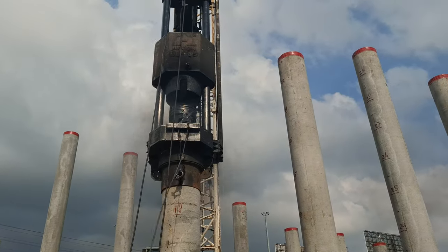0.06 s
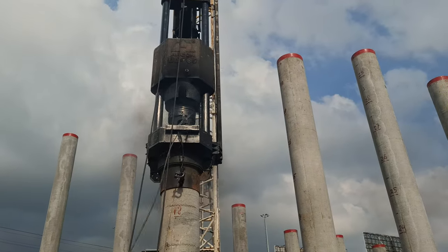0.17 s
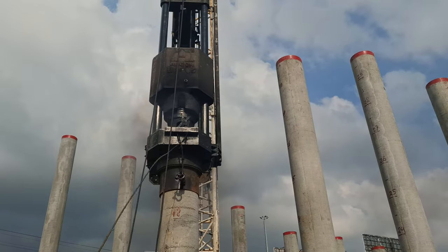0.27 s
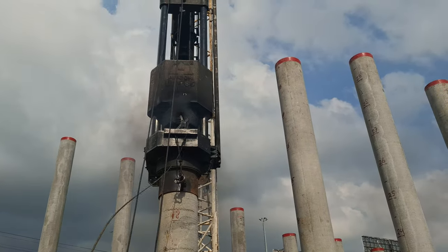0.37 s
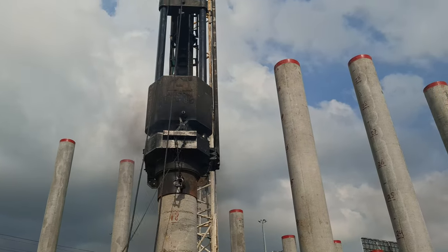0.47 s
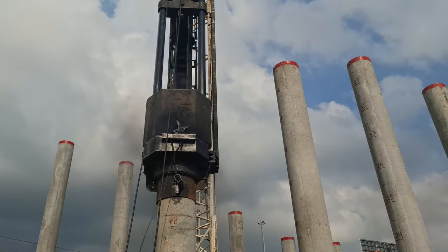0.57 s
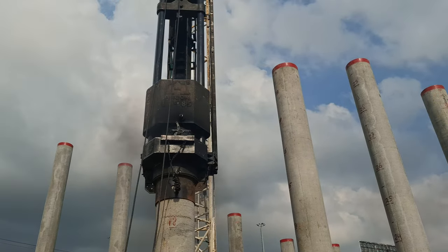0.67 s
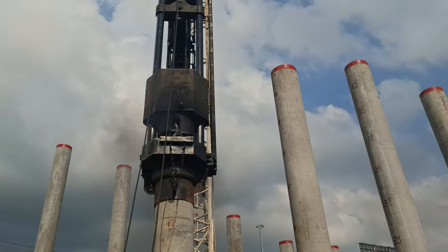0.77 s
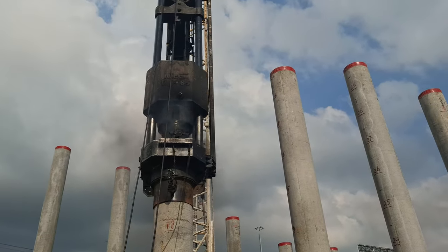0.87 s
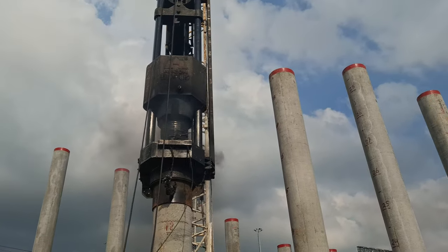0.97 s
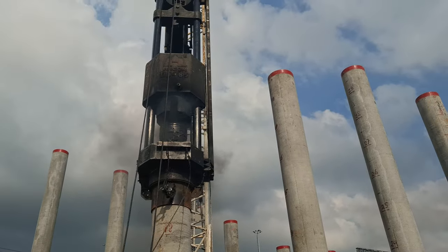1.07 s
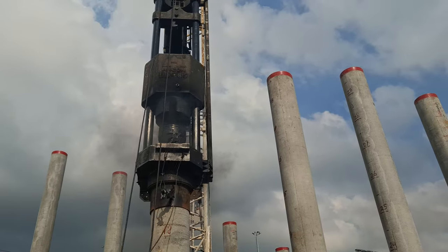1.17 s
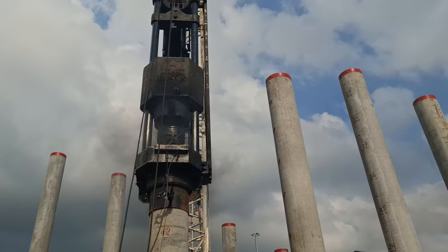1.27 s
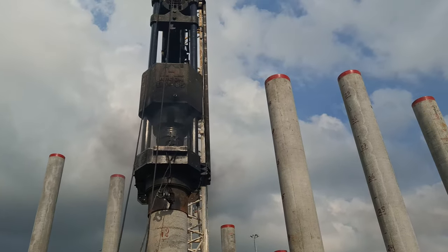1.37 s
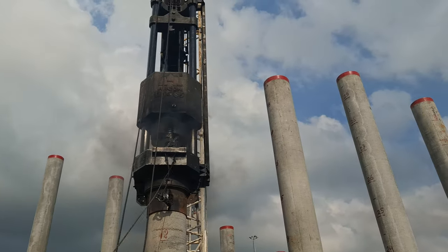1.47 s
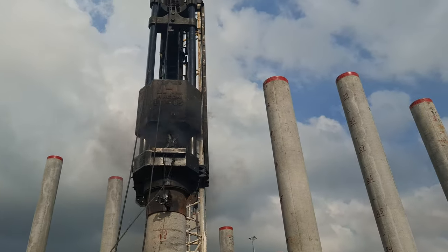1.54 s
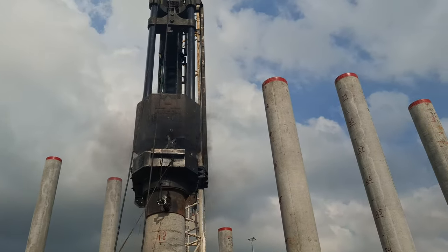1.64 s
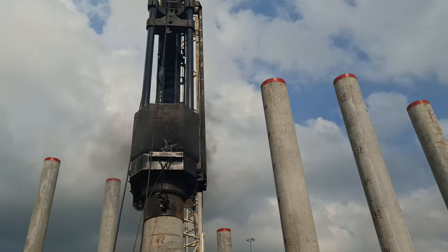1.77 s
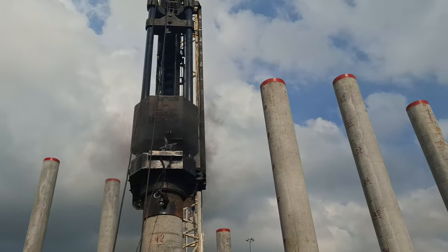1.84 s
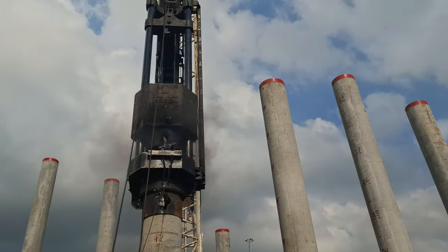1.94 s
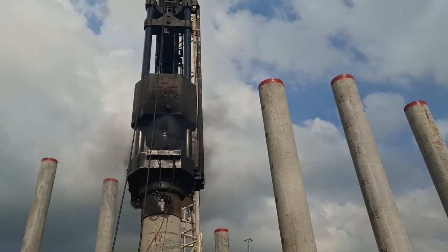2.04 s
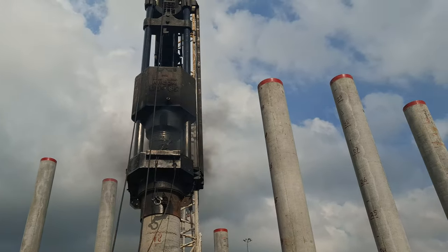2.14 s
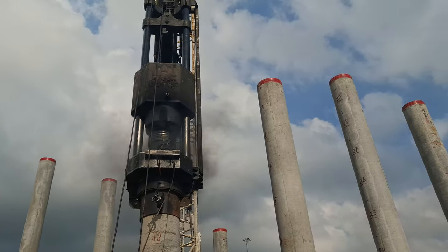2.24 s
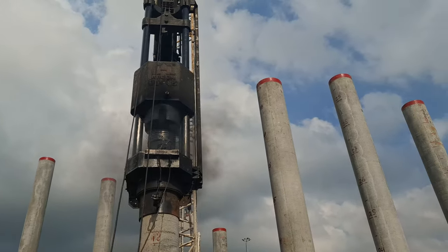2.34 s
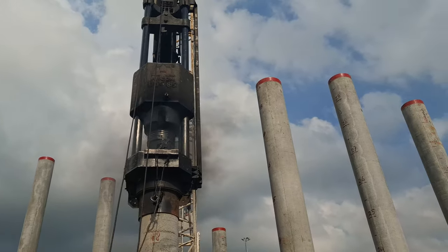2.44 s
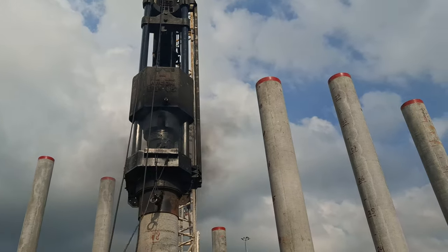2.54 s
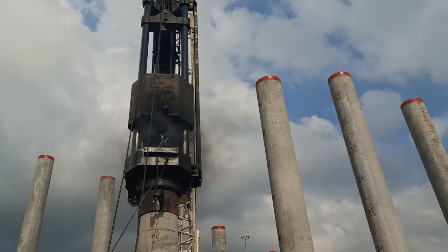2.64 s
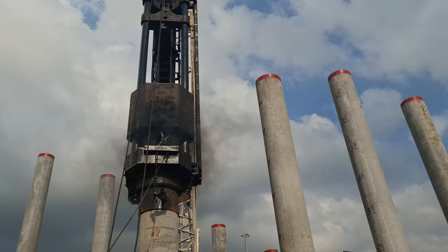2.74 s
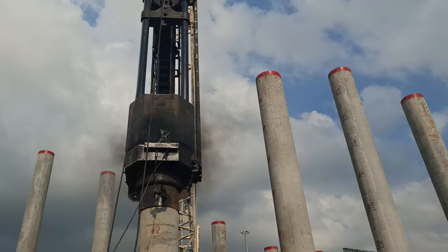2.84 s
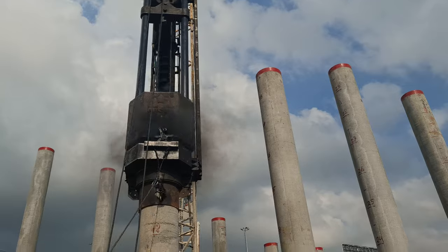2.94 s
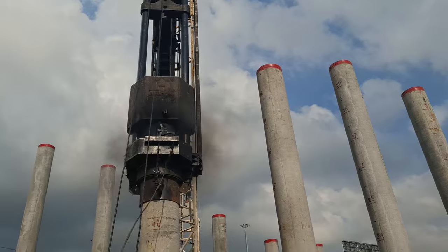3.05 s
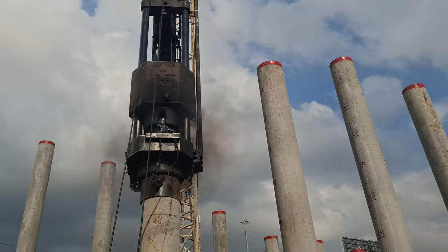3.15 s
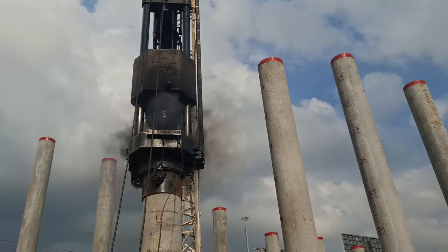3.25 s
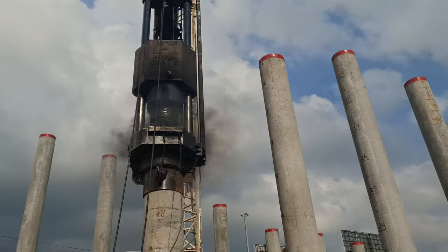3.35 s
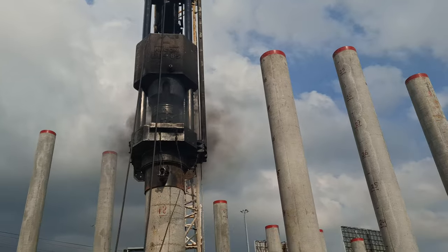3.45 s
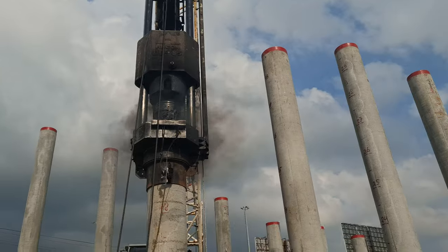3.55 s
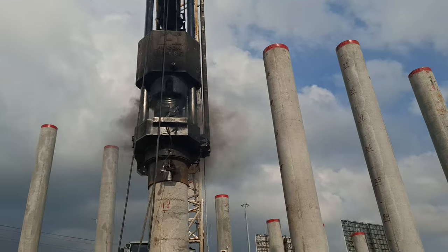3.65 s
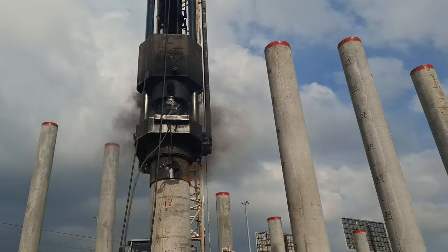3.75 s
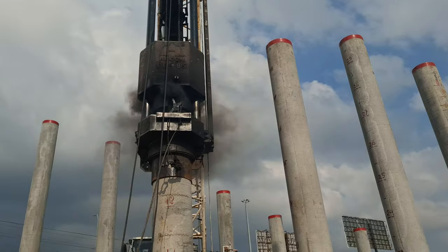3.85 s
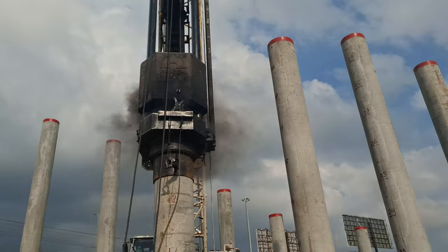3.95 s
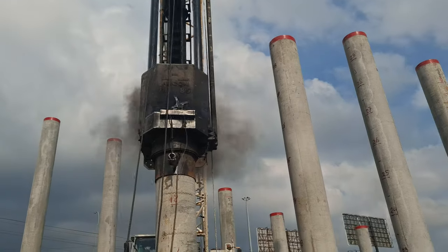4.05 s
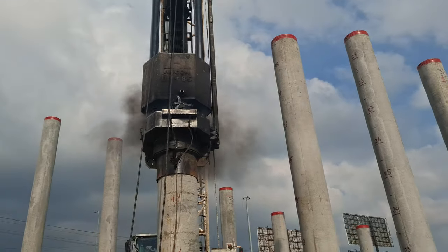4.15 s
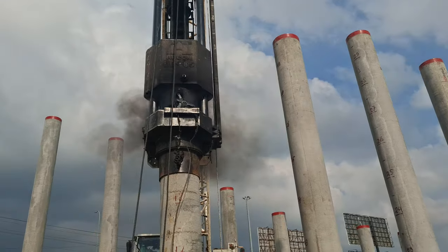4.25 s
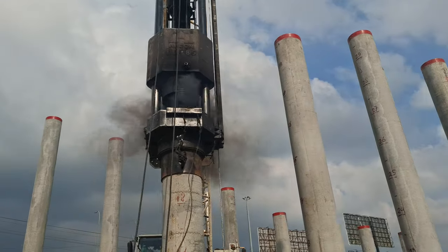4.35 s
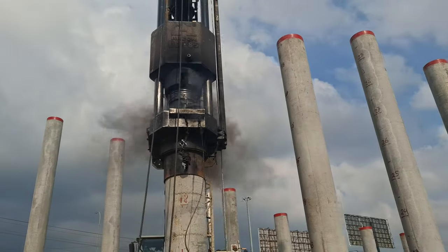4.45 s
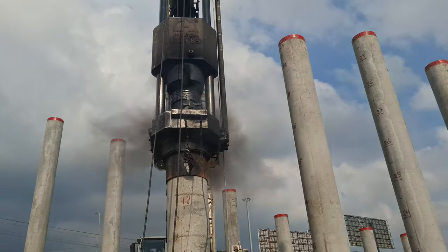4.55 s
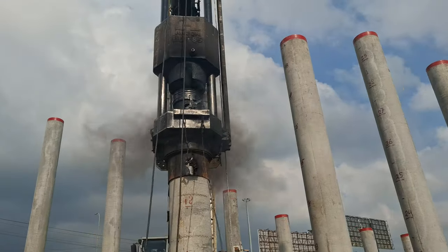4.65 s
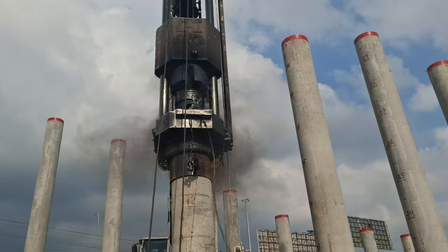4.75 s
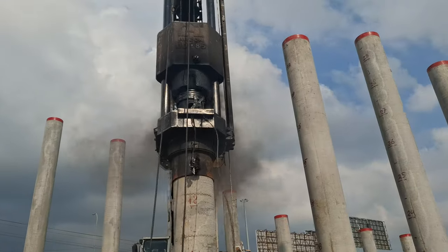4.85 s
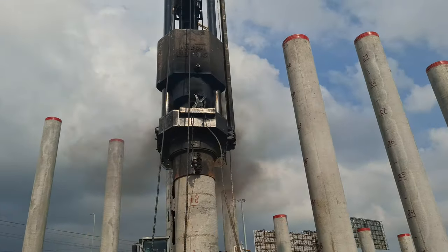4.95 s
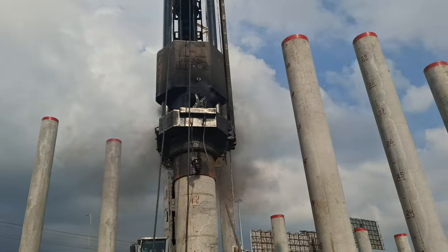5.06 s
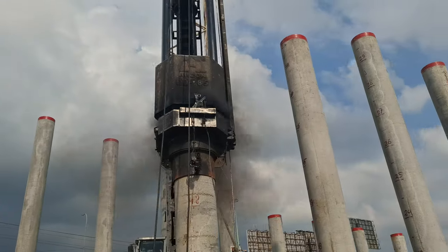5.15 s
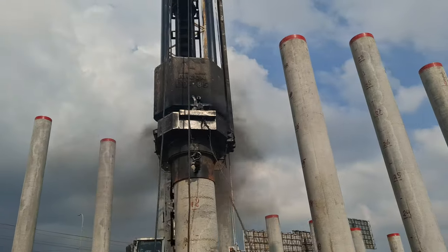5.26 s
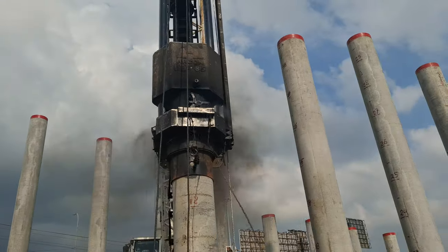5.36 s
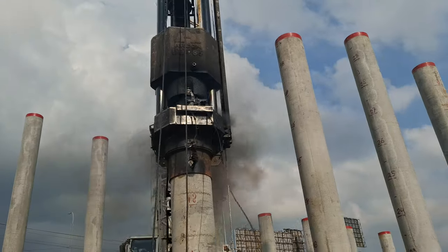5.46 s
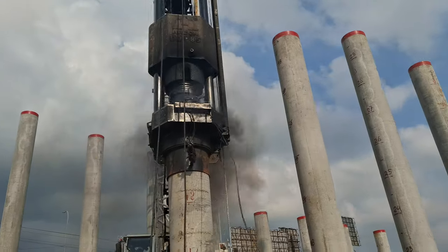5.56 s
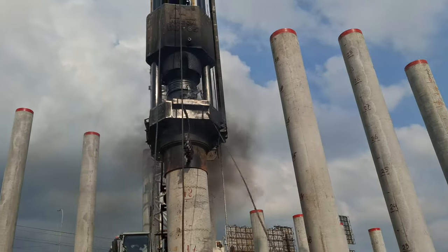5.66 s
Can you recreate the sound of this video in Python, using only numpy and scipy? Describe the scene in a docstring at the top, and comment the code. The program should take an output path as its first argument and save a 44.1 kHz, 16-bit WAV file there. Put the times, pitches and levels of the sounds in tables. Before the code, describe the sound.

Heavy steel clanks, scrapes and slams about once a second as a pile driver fires, with exhaust hiss and faint engine rumble outdoors.

```python
"""A diesel pile hammer drives a concrete pile on an open building site, a blow every 1.16 s.
Each cycle the rig clanks and clacks, the ram scrapes down its guide rods, trips the fuel pump
and strikes; the charge booms, exhaust hisses out and loose steel rings. Contacts are noise
bursts through resonant bodies. Engines rumble behind, and the site echoes."""
import sys
import numpy as np
from scipy import signal
from scipy.fft import rfft, irfft, next_fast_len
from scipy.io import wavfile
from scipy.ndimage import uniform_filter1d, map_coordinates

SR = 44100
rng = np.random.default_rng(int(sys.argv[2]) if len(sys.argv) > 2 else 0)


def wav_record(signal):
    """Record a signal, one row per channel, as 16-bit PCM in the file named by sys.argv[1]."""
    frames = np.transpose(np.atleast_2d(signal))
    bounded = np.clip(frames, -1, 1)
    # unit amplitude maps onto the largest positive 16-bit level
    quanta = np.round(bounded * 32767).astype(np.int16)
    wavfile.write(sys.argv[1], SR, quanta)


N = 252252

# ram lands and fires: (time [s], relative levels [dB] of blow, boom, exhaust, growl, bass, tick, knock)
BLOWS = [(.903, -12.5, -18.5, -23, -29.5, -2.5, -29, -27), (2.086, -11, -14, -21, -24.5, 0, -33.5, -24),
         (3.250, -13, -13, -19, -27.5, 3, -27, -22.5), (4.403, -12, -13, -21.5, -33.5, 5, -28.5, -23.5),
         (5.546, -13.5, -19.5, -23.5, -25.5, 0.5, -24, -22)]
# catch clacks, slide starts: (time [s], relative level [dB], nominal length [s], tilt [dB/octave])
CLACKS = [(0.6, -16, 0.0082, -1), (1.776, -15, 0.012, 0), (2.936, -13.5, 0.021, -1),
          (4.091, -14, 0.017, -3.5), (5.246, -14, 0.0064, 1.5)]
# bare steel contact: (frequency [Hz], level [dB])
STEEL_SPECTRUM = [(100, -45), (300, -14.5), (550, -6.5), (1500, -6.5), (2400, -5), (4500, 3), (7000, -8.5),
                  (12000, -5.5), (16000, -21)]
# mast shudder and air growl: (frequency [Hz], level [dB])
SHUDDER_SPECTRUM = [(40, -52), (100, -0.5), (180, -1.5), (280, -3.5), (560, -3), (900, -8), (2000, -44.5)]
# cylinder resonances: (frequency [Hz], width [Hz], lift [dB])
CYLINDER_MODES = [(2100, 180, 3.5), (2702, 72, 16), (2927, 60, 5.1), (4500, 160, 2.1), (8500, 80, 8.4),
                  (11860, 120, 5)]


def amp(db):
    return 10 ** (np.asarray(db) / 20)


def unit(x):
    return x / np.sqrt(np.mean(x ** 2) + 1e-20)


def along(points, hz):
    """Interpolate (frequency [Hz], value) points on a log axis."""
    f, v = np.transpose(points)
    return np.interp(np.log(hz + 1), np.log(f + 1), v)


def wobble(rate_hz, size):
    """Smooth random curve."""
    knots = rng.standard_normal(8192)
    return map_coordinates(knots, [np.arange(size) * rate_hz / SR], order=2, mode="wrap")


def filtered(x, response):
    """Apply a complex frequency response."""
    m = next_fast_len(N + SR // 2)
    return irfft(rfft(x, m) * response(np.fft.rfftfreq(m, 1 / SR)), m)[..., :N]


def body(spectrum, modes=(), tilt=0, bass_db=0, size=4096):
    """Minimum-phase impulse response of energy 1: a broad spectrum lifted by resonances."""
    hz = np.fft.rfftfreq(size, 1 / SR)
    lift = 1 + sum((amp(db) - 1) / (1 + (2 * (hz - f) / width) ** 2) for f, width, db in modes)
    broad_db = along(spectrum, hz) + tilt * np.log2(1 + hz / 1000) + bass_db / (1 + (hz / 300) ** 4)
    cepstrum = irfft(np.log(np.abs(lift) * amp(broad_db) + 1e-6))[:size // 2]
    response = irfft(np.exp(rfft(2 * cepstrum, size)))
    return response / np.linalg.norm(response)


def through(x, response):
    return signal.fftconvolve(x, response[None], axes=1)[:, :x.shape[1]]


def add(track, at_s, x):
    start = max(round(at_s * SR), 0)
    track[:, start:start + x.shape[1]] += x[:, :max(N - start, 0)]


def grit(size, rough_db):
    """Two noises whose strength jumps together from one tiny contact to the next."""
    return unit(rng.standard_normal((2, size)) * amp(rough_db * wobble(600, size)))


def shimmer(x, depth_db):
    """Short-lived resonances flare and fade: a random gain field over pitch and time."""
    z = signal.stft(x, nperseg=1024, noverlap=768)[2]
    field = rng.standard_normal(z.shape[1:])
    for _ in range(2):
        field = uniform_filter1d(uniform_filter1d(field, 3, 0), 7, 1)
    y = signal.istft(z * unit(amp(depth_db * unit(field))), nperseg=1024, noverlap=768)[1]
    return y[:, :x.shape[1]]


def ring(modes):
    """Steel modes die away, slightly unsteady, at new strengths for every strike."""
    t, tones = np.arange(SR // 2) / SR, 0
    for hz, db, t60_s in modes:
        decay = amp(db + rng.normal(0, 1.2) - 60 * t / t60_s)
        cycles = hz * t + rng.random((2, 1)) + .13 * wobble(70, len(t))
        tones += decay * np.sin(2 * np.pi * cycles)
    return tones * (1 - np.exp(-t / .0058))


def burst(rise_s, hold_s, t60_s, damping, rough_db, lead_db=-60, lead_s=.02):
    """Chattering contact: creeps in, swells, holds, dies. Times hold at 2 kHz; treble is quicker."""
    hz, t, z = signal.stft(shimmer(grit(SR // 2, rough_db), depth_db=3), SR, nperseg=64)
    t = t - lead_s
    life = (np.maximum(hz, 400)[:, None] / 2000) ** -damping
    main = np.clip(t / (rise_s * life), 0, 1) * amp(-60 * np.maximum(t / life - hold_s, 0) / t60_s)
    creep = amp(lead_db) * np.clip(1 + t / lead_s, 0, 1) ** 2 * (t < rise_s)
    return signal.istft(z * (main + creep), SR, nperseg=64)[1], lead_s


def add_hit(track, at_s, db, response, contact):
    """Play a contact through a body, main onset at at_s."""
    force, lead_s = contact
    add(track, at_s - lead_s, amp(db) * through(force, response))


def engines():
    """Machines idle across the site, waver and slowly pick up."""
    spectrum = [(15, -59), (25, -14), (44, -13), (64, -5), (78, -11), (92, -9), (223, -20.5), (256, -24.5),
                (714, -26.5), (1560, -39), (2160, -34), (6380, -49.5), (7510, -50), (16000, -61)]  # rumble: (frequency [Hz], level [dB])
    idle_db, rev_db, waver_db = -45, 5.5, 2.5
    rev_start_s, rev_s = 1.09, 2.7
    revving = np.clip((np.arange(N) / SR - rev_start_s) / rev_s, 0, 1)
    level = amp(idle_db + rev_db * revving + waver_db * wobble(11, N))
    return level * through(grit(N, rough_db=1.5), body(spectrum))


def yard(x):
    """Piles and machines scatter a thin, long tail."""
    decay = [(100, 2.9), (700, 1.07), (3000, 0.85), (8000, 0.89), (16000, 0.57)]  # reverberation: (frequency [Hz], t60 [s])
    hz, t, z = signal.stft(rng.standard_normal((2, SR)), SR, nperseg=256)
    envelope = amp(-60 * t / along(decay, hz)[:, None]) * (1 - np.exp(-t / .0058))
    tail = signal.istft(z * envelope, SR, nperseg=256)[1]
    return signal.fftconvolve(x, tail / np.linalg.norm(tail[0]), axes=1)[:, :N]


def rigging():
    """Struts and cables ring in short, rough notes."""
    pings = [(.356, 2170, -44), (1.715, 7750, -54), (3.76, 4500, -48), (5.112, 435, -33)]  # notes: (time [s], pitch [Hz], relative level [dB])
    out = np.zeros((2, N))
    width_ratio, t60_s = .06, .19
    for at_s, hz, db in pings:
        unsteady = unit(1 + wobble(width_ratio * hz, SR // 2))
        add(out, at_s, unsteady * ring([(hz, db + 7.5, t60_s)]))
    return out


def fitting():
    """Loose steel rattles, rings on and falls back once."""
    clinks = [(0.027, -28), (1.195, -29), (3.615, -24), (4.778, -25)]  # strikes: (time [s], level [dB])
    spectrum = [(100, -7.5), (500, 1), (1200, 1.5), (1800, -2.5), (2900, -2.5), (4700, -1.5), (6000, -9),
                (10000, -15.5), (16000, -23.5)]  # rattle: (frequency [Hz], level [dB])
    modes = [(354, -18, .42), (712, -9, .5), (1200, 0, .23), (1498, -9, .17), (2230, -22, .4),
             (2470, -14.5, .1), (2880, -10.5, .13), (4270, -9, .13), (4680, -6, .084), (6700, -23, .2)]  # ring: (frequency [Hz], level [dB], t60 [s])
    out = np.zeros((2, N))
    rebound_s, rebound_db, ring_db = .143, -22, 2.5
    for at_s, db in clinks:
        for delay_s, loss_db in [(0, 0), (rebound_s, rebound_db)]:
            rattle = burst(rise_s=.0012, hold_s=.012, t60_s=.18, damping=.47, rough_db=3.5)
            add_hit(out, at_s + delay_s, db + loss_db, body(spectrum), rattle)
            add(out, at_s + delay_s, amp(db + loss_db + ring_db) * ring(modes))
    return out


def frame():
    """Heavy contacts clank, bare steel cracks, and the hollow frame clangs under load."""
    # contacts: (time [s], level [dB], rise [s], hold [s], tilt [dB/octave], bass [dB], crack [dB])
    clanks = [(.444, -17, 0.00049, 0.0089, -3.5, 1.5, -27), (0.453, -22.5, 0.0013, 0.02, -0.5, -1, -40),
              (1.607, -20, 0.0024, 0.006, -2, -13, -46), (1.6258, -15.5, 0.0024, 0.0031, -3.5, -8.5, -17.5),
              (2.7662, -13, .001, 0.0023, 0, 2, -13), (2.779, -17, .0021, .0071, 0, -2, -16),
              (3.918, -17.5, 0.0015, .0019, -1, -2, -16.5), (3.932, -16.5, 0.0018, .015, 0, -3.5, -37),
              (5.069, -16.5, .013, 0.013, -5.5, -0.5, -37), (5.087, -14, 0.00088, 0.0013, -1.5, 0.5, -40),
              (5.102, -19.5, 0.001, 0.0038, -2.5, -3.5, -28)]
    clank_spectrum = [(50, -22), (160, 0.5), (260, -9.5), (450, 2), (1300, -6), (2400, -6.5), (4000, -13.5),
                      (7000, -14), (11000, -18.5), (16000, -29)]  # heavy contact: (frequency [Hz], level [dB])
    frame_modes = [(171, 51, 2.8), (565, 31, 2.7), (793, 48, 7.1), (1310, 94, 12.2), (1970, 110, 3.6),
                   (2890, 230, 8), (3504, 140, 10.7), (3655, 110, 4), (4550, 150, 4.9), (6340, 98, 3.8),
                   (9300, 380, 3.6), (10400, 280, 1.7)]  # frame resonances: (frequency [Hz], width [Hz], lift [dB])
    steel_modes = [(3800, 300, 4.7), (6070, 290, 13), (7970, 260, 14)]  # crack resonances: (frequency [Hz], width [Hz], lift [dB])
    clangs = [(1.628, -20), (2.782, -14), (3.941, -20.5), (5.087, -23.5)]  # frame takes the load: (time [s], level [dB])
    clang_spectrum = [(200, -32), (600, -21.5), (950, 3), (1350, 9), (1900, 8.5), (2500, -23.5),
                      (5000, -29), (16000, -52)]  # hollow frame: (frequency [Hz], level [dB])
    out = np.zeros((2, N))
    for at_s, db, rise_s, hold_s, tilt, bass_db, crack_db in clanks:
        clank = burst(rise_s, hold_s, t60_s=.13, damping=.061, rough_db=3.5, lead_db=-13, lead_s=.026)
        add_hit(out, at_s, db, body(clank_spectrum, frame_modes, tilt, bass_db), clank)
        crack = burst(rise_s=.0003, hold_s=.002, t60_s=.018, damping=.1, rough_db=2)
        add_hit(out, at_s, crack_db, body(STEEL_SPECTRUM, steel_modes, tilt=2), crack)
    for at_s, db in clangs:
        clang = burst(rise_s=.0005, hold_s=.013, t60_s=.063, damping=.099, rough_db=.5)
        add_hit(out, at_s, db, body(clang_spectrum), clang)
    return out


def catch():
    """The catch touches, slams home and rings on."""
    clack_modes = [(880, 40, 1.4), (1130, 110, 2), (2880, 83, 7.9), (3270, 72, 12), (5850, 570, 4.4),
                   (8740, 320, 6.1), (12600, 93, 5.7), (12300, 160, 6.7)]  # catch resonances: (frequency [Hz], width [Hz], lift [dB])
    ring_modes = [(616, -2.5, 0.57), (1224, 2.5, 0.25), (3100, -6, 0.064), (3220, -9, .08)]  # after-ring: (frequency [Hz], level [dB], t60 [s])
    out = np.zeros((2, N))
    for at_s, db, length_s, tilt in CLACKS:
        steel = body(STEEL_SPECTRUM, clack_modes, tilt)
        touch = burst(rise_s=.0009, hold_s=.0035, t60_s=.035, damping=.14, rough_db=2)
        add_hit(out, at_s, db - 4.5, steel, touch)
        slam = burst(rise_s=.001, hold_s=.18 * length_s, t60_s=.12, damping=.79, rough_db=.5)
        add_hit(out, at_s + .0085, db - .5, steel, slam)
        add(out, at_s + .00503, amp(db - 14) * ring(ring_modes))
    return out


def fuel_pump():
    """The ram trips the pump just before each blow."""
    spectrum = [(1000, -27.5), (4000, -6), (8300, 1), (11000, -14), (16000, -10)]  # tick: (frequency [Hz], level [dB])
    out = np.zeros((2, N))
    for at_s, *_, db, _ in BLOWS:
        tick = burst(rise_s=.00082, hold_s=.0044, t60_s=.018, damping=.089, rough_db=1.5)
        add_hit(out, at_s - .0435, db, body(spectrum), tick)
    return out


def slide():
    """The falling ram scrapes its guide rods and shakes the mast; the rods retune as it descends."""
    peaks = [(0.674, -21, -48), (1.852, -20, -35), (3.026, -19, -37.5), (4.18, -18.5, -30),
             (5.334, -19, -27.5)]  # ram bears fully on the rods: (time [s], scrape [dB], shudder [dB])
    spectrum = [(200, -17.5), (600, -4), (1100, 1), (2000, 1), (3000, -2.5), (4600, -2.5), (6500, -11),
                (10000, -16.5), (13000, -17.5), (16000, -25)]  # friction: (frequency [Hz], level [dB])
    high_modes = [(1150, 150, 8.5), (1960, 55, 13.9), (2515, 180, 9.1), (3120, 66, 13.3), (4680, 210, 7.6),
                  (7250, 83, 2.3), (11400, 160, 9), (12700, 150, 6)]  # rods, ram high: (frequency [Hz], width [Hz], lift [dB])
    low_modes = [(1211, 36, 13), (2246, 100, 10.1), (2764, 83, 13.8), (4470, 190, 3.3), (8440, 150, 6.6),
                 (11240, 160, 12), (13100, 120, 7.7)]  # rods, ram low: (frequency [Hz], width [Hz], lift [dB])
    touch_s, grip_s, hold_s, retune_s = .01, .037, .019, .1
    scrape_grip_db, scrape_db_per_s = 12.5, 83
    mast_grip_db, mast_db_per_s = 16.5, 47
    out, t = np.zeros((2, N)), np.arange(N) / SR
    scrape, shudder, fallen = np.zeros((3, N))
    for (peak_s, scrape_db, shudder_db), (start_s, *_), (end_s, *_) in zip(peaks, CLACKS, BLOWS):
        touch = np.clip(np.minimum(t - start_s, end_s + touch_s - t) / touch_s, 0, 1)
        slack = np.clip((peak_s - t) / grip_s, 0, 1)
        easing_s = np.maximum(t - peak_s - hold_s, 0)
        scrape += touch * amp(scrape_db - scrape_grip_db * slack - scrape_db_per_s * easing_s)
        shudder += touch * amp(shudder_db - mast_grip_db * slack - mast_db_per_s * easing_s)
        fallen += (touch > 0) * np.minimum(easing_s / retune_s, 1)
    for share, modes in [(1 - fallen, high_modes), (fallen, low_modes)]:
        friction = scrape * amp(1.1 * wobble(70, N)) * shimmer(grit(N, rough_db=1), depth_db=3.5)
        out += through(np.sqrt(share) * friction, body(spectrum, modes))
    return out + through(shudder * grit(N, rough_db=1), body(SHUDDER_SPECTRUM))


def exhaust():
    """As the ram lifts, gas hisses out of the ringing cylinder, which adds a short round-trip echo."""
    spectrum = [(100, 9.5), (450, -12.5), (900, -9.5), (1800, 5.5), (3000, -1.5), (4600, 1), (7500, -6),
                (13000, -8.5), (16000, -13)]  # gas jet: (frequency [Hz], level [dB])
    out, t = np.zeros((2, N)), np.arange(SR * 3 // 4) / SR
    cylinder, round_trip = body(spectrum, CYLINDER_MODES), round(.0017 * SR)
    flow = amp(np.interp(t, [0, .03, .09, .125, .2, .3, .7], [-10, -2, 2, -5.5, -19, -47, -72]))
    for at_s, _, _, db, *_ in BLOWS:
        jet = through(flow * shimmer(grit(len(t), rough_db=3), depth_db=3.5), cylinder)
        echo = .5 * np.pad(jet, ((0, 0), (round_trip, 0)))[:, :len(t)]
        add(out, at_s + .022, amp(db - 7.5) * (jet + echo))
    return out


def boom(hz=60, swell_s=.034, push_db=-7, push_s=.0079):
    """The gas leaves with one push and a low swelling ring that comes back from far walls."""
    echoes = [(0.087, -7.5), (0.141, -16), (.216, -11), (0.328, -28.5)]  # returns from buildings: (delay [s], level [dB])
    out, t = np.zeros((2, N)), np.arange(SR // 2) / SR
    swell_age, push_age = t / swell_s, t / push_s
    tone = (swell_age * np.exp(1 - swell_age)) ** 1.5 * np.sin(2 * np.pi * hz * t)
    push = amp(push_db) * push_age * (push_age - 2) * np.exp(1 - push_age)
    for at_s, _, db, *_ in BLOWS:
        add(out[:1], at_s + .0266, amp(db) * (tone + push)[None])
        for delay_s, echo_db in echoes:
            add(out[:1], at_s + .0275 + delay_s, amp(db + echo_db) * tone[None])
    return out


def ram_blows():
    """Squeezed air growls, the ram crashes on the anvil, and the drive cap knocks as it settles."""
    blow_spectrum = [(40, -3.5), (100, -2.5), (170, -5.5), (260, -6.5), (420, 0.5), (600, -1), (1000, -1),
                     (1350, -3.5), (2200, -8), (3200, 0.5), (4500, -2.5), (7000, -7.5), (11000, -12),
                     (16000, -15)]  # ram on anvil: (frequency [Hz], level [dB])
    pile_modes = [(430, 25, 6), (699, 22, 8.5), (1297, 70, 6.5), (1930, 320, 8), (3760, 80, 1.5),
                  (6200, 120, 6), (8440, 170, 6.5)]  # pile resonances: (frequency [Hz], width [Hz], lift [dB])
    knock_spectrum = [(200, -18.5), (1000, -7), (2700, -6), (4200, -6), (6500, -15.5), (16000, -30)]  # drive cap: (frequency [Hz], level [dB])
    out, air, cap = np.zeros((2, N)), body(SHUDDER_SPECTRUM), body(knock_spectrum, CYLINDER_MODES)
    for at_s, db, _, _, growl_db, bass_db, _, knock_db in BLOWS:
        crash = burst(rise_s=.0056, hold_s=.019, t60_s=.074, damping=.24, rough_db=-.45,
                      lead_db=-10, lead_s=.025)
        add_hit(out, at_s, db + 2, body(blow_spectrum, pile_modes, bass_db=bass_db), crash)
        growl = burst(rise_s=.031, hold_s=.044, t60_s=.22, damping=.14, rough_db=4.5, lead_db=-5)
        add_hit(out, at_s - .04, growl_db, air, growl)
        knock = burst(rise_s=.008, hold_s=.016, t60_s=.07, damping=.05, rough_db=1.5, lead_db=-16)
        add_hit(out, at_s + .143, knock_db, cap, knock)
    return out


def ports(x):
    """Row 0 (shared) and row 1 (unshared) reach two microphone ports; the housing shifts the phases."""
    likeness = [(60, 0.92), (400, 0.96), (1500, 0.5), (4500, 0.46), (8000, 0.28), (14000, 0.092)]  # left-right likeness: (frequency [Hz], coherence [0..1])
    left_lead = [(0, 0.31), (850, 0.38), (1800, 1.19), (2700, -0.17), (3500, 0.84), (4500, 1.14),
                 (5500, 3.5), (7200, 4), (8300, 4.5), (10400, 9), (15000, 11.5)]  # lead of the left port: (frequency [Hz], phase [rad])
    turn = lambda hz: np.arccos(np.clip(along(likeness, hz), -1, 1)) / 2
    mid, side = filtered(x, lambda hz: np.array([np.cos(turn(hz)), np.sin(turn(hz))]))
    shift = lambda hz: np.exp(.5j * np.interp(hz, *np.transpose(left_lead)) * np.array([[1], [-1]]))
    return filtered(np.array([mid + side, mid - side]), shift)


def scene():
    """The hammer and its yard echo over the engines, reaching the left port slightly earlier."""
    firing = ram_blows() + exhaust()
    clatter = frame() + catch() + fuel_pump() + fitting() + rigging()
    scrape, thud = slide(), boom()
    echo = yard(amp(-14.5) * firing + amp(-17) * clatter + amp(-14) * scrape + amp(-19) * thud)
    return ports(firing + clatter + scrape + thud + echo + engines()) * amp([[.2], [-.2]])


def record(dry):
    """Low cut, soft peak limit, steep band limit."""
    low_hz, ceiling, top_hz = 30, .95, 15900
    lean = filtered(dry, lambda hz: hz ** 4 / (hz ** 4 + low_hz ** 4))
    rounded = lean / (1 + np.abs(lean / ceiling) ** 6) ** (1 / 6)
    return filtered(rounded, lambda hz: 1 / (1 + (hz / top_hz) ** 160))


dry = scene()
out = record(dry)
wav_record(out)
```